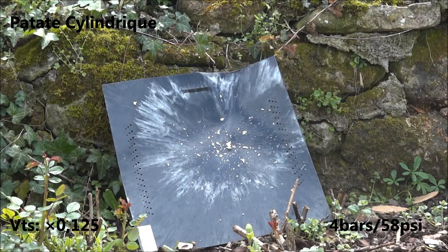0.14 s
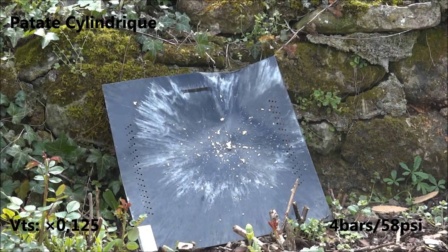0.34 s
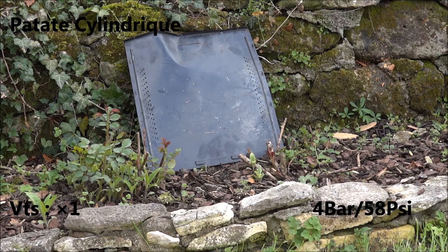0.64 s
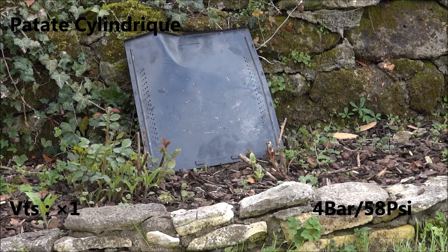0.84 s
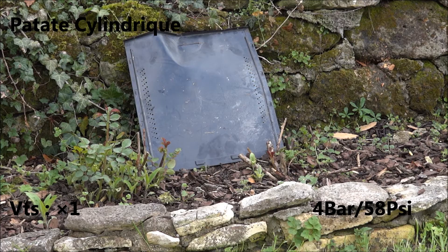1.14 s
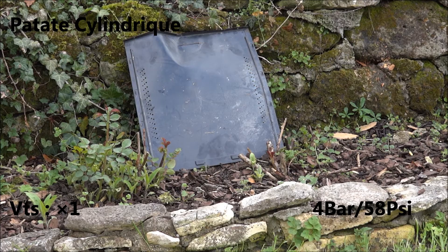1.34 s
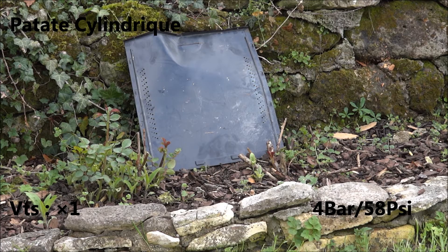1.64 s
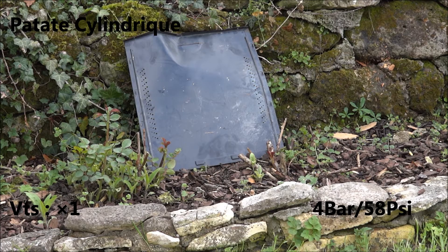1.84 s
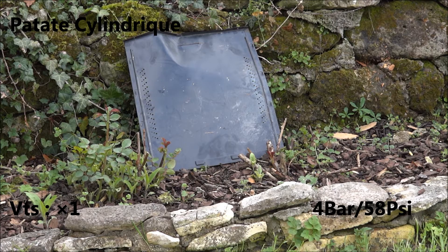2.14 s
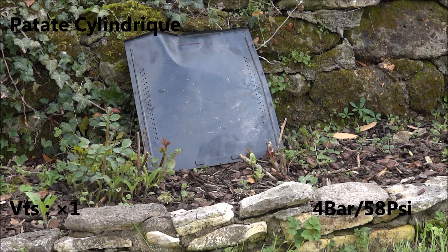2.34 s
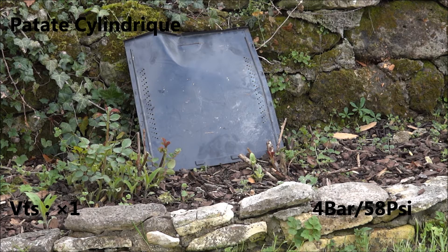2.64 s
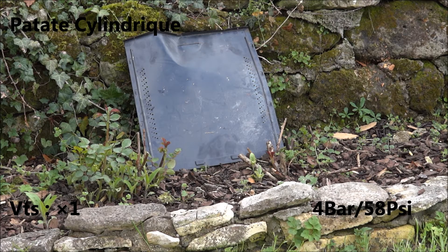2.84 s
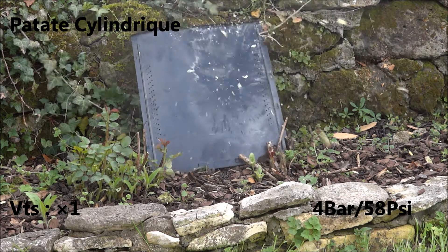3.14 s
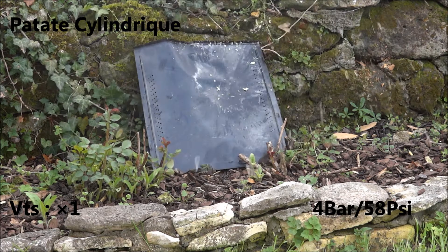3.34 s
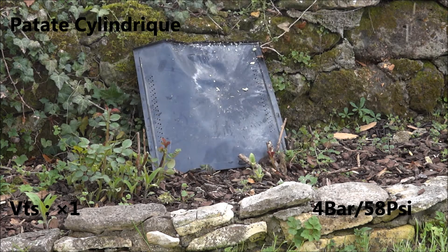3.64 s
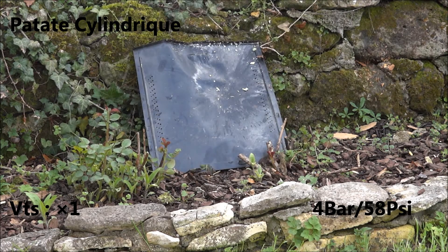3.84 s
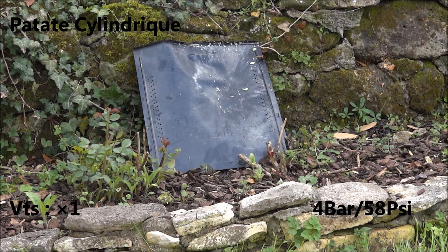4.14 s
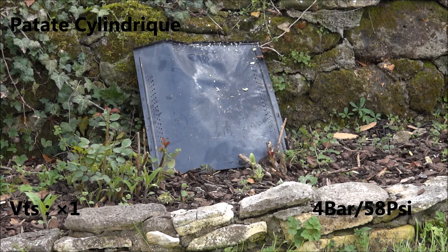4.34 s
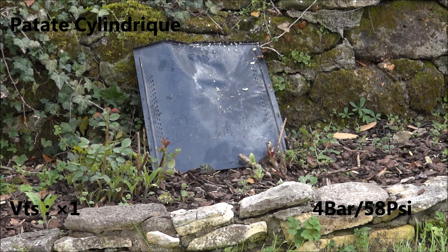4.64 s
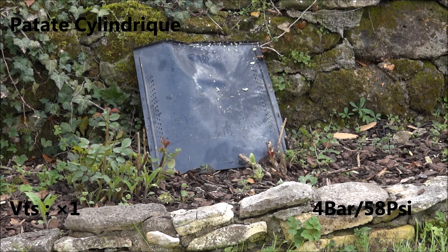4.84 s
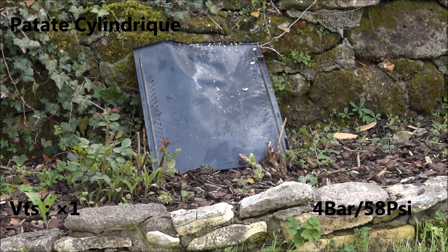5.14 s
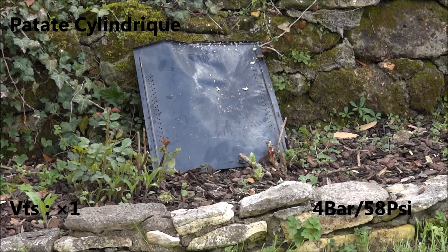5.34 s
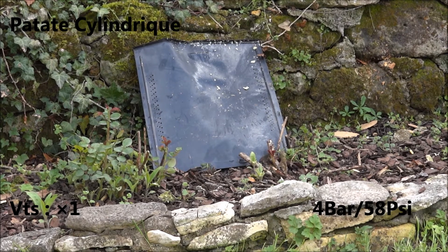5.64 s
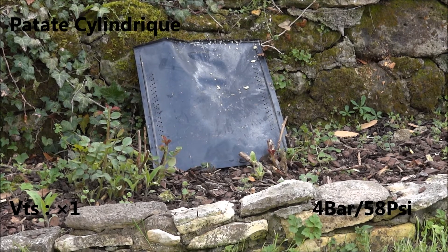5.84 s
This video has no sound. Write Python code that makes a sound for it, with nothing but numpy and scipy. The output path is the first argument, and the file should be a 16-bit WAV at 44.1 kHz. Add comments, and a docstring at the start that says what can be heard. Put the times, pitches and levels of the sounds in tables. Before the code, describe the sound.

Silence at first, then a quiet garden with small birds chirping over distant hush. Near three seconds a homemade air cannon hisses, pops twice and roars as a potato slams a thin metal plate. The sheet crashes, rattles and clanks back onto stones within half a second. The background returns ducked, slowly recovering, with light ticks, leaf rustle and sparse birds. Close, dry plate; stereo outdoor microphone.

```python
"""A hiss, two pops and a roar of air, then sheet metal crashes and rattles: an air cannon hits its plate.
The homemade cannon shoots a potato: noise for valve and jet, sine pulses that repeat along the tube.
The plate, near and dry, leans on a garden wall and rings in tuned modes; it falls back on the stones.
Gritty noise bursts make falling bits and leaves; small birds sing in swept tones over a distant hush.
At the microphone a gain control ducks and slowly recovers, peaks are rounded and the top is cut off."""
import sys
import numpy as np
from scipy import signal
from scipy.fft import rfft, irfft
from scipy.io import wavfile
from scipy.ndimage import uniform_filter1d, minimum_filter1d

SR = 44100
rng = np.random.default_rng(int(sys.argv[2]) if len(sys.argv) > 2 else 0)


def wav_out(sig):
    """Save sig, one row per channel (or a flat mono array), as 16-bit PCM at SR to the path in sys.argv[1]."""
    wavfile.write(sys.argv[1], SR, np.round(np.clip(np.atleast_2d(sig).T, -1, 1) * 32767).astype(np.int16))


N = 263975
TIME = np.arange(N) / SR

# Cannon: valve hiss spectrum (f/Hz, relative level/dB per Hz)
VALVE_COLOUR = [(100, -33.5), (500, -23), (1200, -10), (2300, -6), (3300, -7), (4400, -7), (5900, -14.5),
                (8000, -10), (10000, -13.5), (12500, -20), (14500, -17), (16000, -25.5)]
# pressure pulses in the valve, then in the barrel (t/s, level/dB, f/Hz)
POPS = [(2.8872, -4, 3450), (2.9168, -3, 2440)]
# air jet spectrum (f/Hz, relative level/dB per Hz)
JET_COLOUR = [(18, -53.5), (30, -24.5), (93, -17.5), (280, -1.5), (1130, -4), (1500, -5.5), (1670, -5.5),
              (1810, -4), (2540, -4), (3400, -7), (5900, -8.5), (8300, -8.5), (14400, -22), (16000, -41.5)]
# air hisses through the opening valve
VALVE_S, VALVE_ATTACK_S, VALVE_HOLD_S, VALVE_T60_S, VALVE_DB = 2.880, .008, .019, .05, -18
# each pulse swells, runs up and down the tube and weakens on every trip
POP_SWELL_S, POP_TRIP_S, POP_LOSS_DB = .0007, .0038, 3
# air leaks out ahead of the potato
LEAK_S, LEAK_ATTACK_S, LEAK_DB = 2.915, .007, -13.5
# the full jet follows it, sags as the tank empties, then dies away
JET_S, JET_ATTACK_S, JET_HOLD_S, JET_T60_S, JET_DB, JET_SAG_DB_PER_S = 2.972, .01, .113, .33, -4, 42

# Plate: the potato strikes, the plate slams about, then falls back on the stones
# (t/s, level/dB, bright up to f/Hz)
BLOWS = [(2.9755, 2.5, 12200), (3.010, 1.5, 550), (3.016, -4, 7000), (3.023, -2.5, 910), (3.041, -.5, 805),
         (3.083, -9, 3000), (3.092, -2, 1480), (3.135, -8, 684), (3.278, -21.5, 3000), (3.2912, -7.5, 5100),
         (3.2945, -10, 3000), (3.329, -9.5, 500), (3.381, -19.5, 2000)]
# its strongest modes (f/Hz, relative level/dB, t60/s)
PLATE_MODES = [(201.8, -8, .2), (235, -7, 0.25), (267, -5, 0.23), (332.5, -10, 0.31), (395.6, -4, .2),
               (452, -1.5, 0.18), (543, -2, 0.2), (596.7, -5.5, .2), (653, -11.5, 0.11), (765, -5.5, 0.27),
               (825, -2.5, 0.15), (837, -2.5, 0.3), (1058, -3, 0.19), (1164, -5.5, 0.26), (1270, -14, 0.27),
               (1480, -8, 0.12), (1660, -8.5, .2), (2000, -9, 0.2), (2110, -13.5, .22), (2580, -7, .18)]
# its crowd of weaker modes: spectrum (f/Hz, relative level/dB per Hz) and decay (f/Hz, t60/s)
CRASH_COLOUR = [(30, -48), (100, -28), (200, -12), (450, -9.5), (900, -7.5), (1600, -4.5), (2600, -6),
                (4000, -4), (6500, -8), (10000, -6), (12500, -24), (16000, -25.5)]
CRASH_T60 = [(200, .22), (1000, 0.36), (3000, 0.088), (10000, .09)]
# after a blow the sheet chatters in weaker, duller rebounds
REBOUND_S, REBOUND_LOSS_DB, REBOUND_DULLING = .02, 14, .7
# build-up time of a contact bright up to 1 kHz; brighter ones are shorter
CONTACT_S = .0013
# the plate's edge scrapes the wall as it falls back
SCRAPE_S, SCRAPE_ATTACK_S, SCRAPE_T60_S, SCRAPE_DB = 3.25, .04, .22, -28
# the sheet flexes while it is thrown clear of the wall
WOBBLE_S, WOBBLE_ATTACK_S, WOBBLE_HOLD_S, WOBBLE_T60_S = 3.15, .06, .13, .15
WOBBLE_HZ, WOBBLE_DB = 165, -45

# Ground: twigs cracking and the larger bits landing (t/s, level/dB, f/Hz, t60/s)
TICKS = [(1.013, -39, 4900, .027), (3.513, -29, 9500, .0055), (3.7257, -11.5, 9500, .0033),
         (3.7254, -25, 1600, .0095), (3.943, -35.5, 9580, .009), (4.155, -34, 8000, .0085),
         (4.175, -39, 8070, .025), (4.742, -37.5, 9000, .017), (5.273, -36.5, 5900, .062),
         (5.327, -37, 4900, .035), (5.762, -39, 3920, .0088), (5.7835, -30.5, 1600, .009)]
# smaller crumbs patter down at random, their level spread evenly to either side
PATTER_FROM_S, PATTER_TO_S, PATTER_DB, PATTER_SPREAD_DB = 4.12, 4.95, -45, 3
PATTER_HZ, PATTER_T60_S = 8200, .012
# leaves stir: peaks (t/s, level/dB, time/s to swell or settle by 8.7 dB)
RUSTLES = [(.8, -54, .03), (.89, -50.5, .11), (3.7, -57, .2), (4.3, -54, .13), (4.5, -57, .09),
           (4.76, -57, .1), (5.29, -47, .022), (5.61, -56, .025)]
# leaf spectrum (f/Hz, relative level/dB per Hz)
RUSTLE_COLOUR = [(200, -22.5), (1500, 4.5), (4000, -4), (7000, -5), (9500, 2), (12000, -9.5),
                 (16000, -10.5)]

# Birds among the trees: chips that sweep steeply down
# (t/s, length/s, start f/Hz, level/dB, left minus right/dB)
CHIPS = [(.698, .026, 5000, -53.5, 2), (1.422, .042, 4750, -49.5, 4), (1.485, .09, 5400, -60, 4),
         (2.33, .04, 5200, -57.5, 2), (2.535, .06, 3950, -53, 3), (2.833, .035, 3400, -56, 3),
         (4.097, .02, 4950, -53.5, -7), (4.19, .03, 5400, -56, -3), (4.676, .033, 5400, -53.5, -5),
         (4.789, .018, 6100, -56, 2), (5.001, .028, 5100, -49.5, -3), (5.511, .045, 4750, -56, -4)]
# the pitch chips head for; share of the way still left at the end
CHIP_FLOOR_HZ, CHIP_LEFT_SHARE = 2600, .33
# clear whistles, most sliding down, that settle on a steady or drifting note
# (t/s, length/s, start f/Hz, settled f/Hz, sag/Hz per s, level/dB, waver 0-1, left minus right/dB)
WHISTLES = [(1.085, .27, 7350, 5980, 2200, -49, .11, 4), (1.10, .28, 5250, 4750, 1200, -56, .12, 4),
            (1.655, .065, 4380, 4450, 0, -55, .06, -4), (1.765, .207, 6000, 4090, -400, -39, .16, 2.5),
            (1.955, .22, 4300, 3480, 1600, -50.5, .6, 1), (5.3, .13, 4480, 4450, 0, -61, .25, 1),
            (5.642, .05, 4660, 4460, 0, -41.5, .02, -2.5), (5.752, .06, 3660, 3590, 0, -53.5, .04, -1.5)]
# a whistle is soft at the top of its slide and gains strength as it settles
WHISTLE_SETTLE_S, WHISTLE_SLIDE_SHAPE, WHISTLE_SOFT_DB_PER_HZ = .05, 1.5, .013
# hoarse chatter on a nearly level pitch (t/s, length/s, f/Hz, level/dB, waver 0-1)
CHIRPS = [(.781, .038, 2500, -52.5, 1), (.805, .135, 3500, -46.5, .7), (.821, .08, 4250, -53.5, .6),
          (.868, .06, 2820, -41.5, .55), (.93, .019, 3560, -35.5, .26), (.941, .039, 3000, -49, 1),
          (.948, .095, 3630, -44.5, .65), (1.55, .041, 3760, -50.5, .9), (1.655, .059, 3780, -48.5, .8),
          (1.721, .028, 2880, -50, .5), (2.1, .15, 3600, -56, 1), (5.38, .24, 3300, -62, .8)]
CHIRP_PAN_DB = 4  # left minus right
# an even series of thin rising pips
PIPS_S, PIP_PERIOD_S, PIP_S, PIP_FROM_HZ, PIP_TO_HZ = 2.241, .1107, .024, 5300, 6400
PIP_DB, PIP_WAVER, PIP_PAN_DB = -58, .6, 3

# Distance: hush spectrum (f/Hz, relative level/dB per Hz)
HUSH_COLOUR = [(15, -37), (25, -13), (64, -4.5), (236, -1.5), (503, -1), (607, 2), (840, 1.5), (2480, -9.5),
               (3720, -13), (5140, -13.5), (6920, -16), (12900, -18), (14800, -22.5), (16000, -31)]
HUSH_DB = -51.4

# Microphone: stereo width of far and near sounds (f/Hz, side minus mid/dB)
FAR_WIDTH = [(60, -14), (110, -14), (200, -8), (380, -2), (700, -3), (1290, -1.5), (2380, -3), (4400, -8),
             (8120, -10.5), (15000, -29.5)]
NEAR_WIDTH = [(100, -26.5), (500, -12), (1300, -13), (3000, -12), (8000, -10.5), (14000, -19)]
# live span (from t/s, to t/s)
LIVE_SPAN = (.553, 5.957)
TOP_HZ = 15700  # treble cut-off


def cannon(turbulence_db=2.5, turbulence_hz=450, sizzle_hz=10500, sizzle_power=0.3,
           gust_db=-38, gust_s=2.965, gust_length=0.028, trip_jitter=.12):
    """The valve hisses, pulses ring the tube, and a turbulent jet follows with a low gust."""
    valve = noise(VALVE_COLOUR, NEAR_WIDTH, size=N) * undb(VALVE_DB)
    valve = valve * envelope(VALVE_S, VALVE_ATTACK_S, VALVE_HOLD_S, VALVE_T60_S)

    leak = undb(LEAK_DB) * envelope(LEAK_S, LEAK_ATTACK_S, JET_S - LEAK_S, JET_T60_S)
    sag_db = JET_SAG_DB_PER_S * np.clip(TIME - JET_S, 0, JET_HOLD_S)
    jet = undb(JET_DB - sag_db) * envelope(JET_S, JET_ATTACK_S, JET_HOLD_S, JET_T60_S)
    flow = np.maximum(leak, jet)
    roar = filtered(noise(JET_COLOUR, NEAR_WIDTH, size=N), [130, sizzle_hz], "band", order=4)
    # the topmost sizzle dies first as the pressure falls
    sizzle = filtered(noise(JET_COLOUR, NEAR_WIDTH, size=N), sizzle_hz, "high", order=4)
    sizzle = sizzle * (flow / flow.max()) ** sizzle_power
    turbulence = undb(turbulence_db * walk(turbulence_hz, size=N))
    out = (valve + flow * (roar + sizzle)) * turbulence

    t = TIME[:SR // 20]
    packet = (t / POP_SWELL_S * np.exp(1 - t / POP_SWELL_S)) ** 2
    for s, db, hz in POPS:
        pulse = packet * np.sin(2 * np.pi * hz * t)
        for trip, chance in enumerate(rng.standard_normal(size=4)):
            delay = trip * POP_TRIP_S * (1 + trip_jitter * chance)
            add(out, s + delay, undb(db - trip * POP_LOSS_DB) * pulse)

    gust = noise([(15, -7), (40, 0), (90, -3), (200, -26), (600, -79)], NEAR_WIDTH, size=N)
    return out + undb(gust_db) * gust * np.exp(-((TIME - gust_s) / gust_length) ** 2)


def plate(modes_db=-6.0, crash_db=-2, bend_share=.014):
    """Each blow rings the modes in new phases over a short crash; soft contacts are dull."""
    out, t = np.zeros((2, N)), TIME[:SR // 2]
    hz, db, t60 = np.transpose(PLATE_MODES)[:, :, None]
    rings = undb(db) / np.sqrt(np.sum(undb(db) ** 2) / 2) * fade(t, t60)
    octave = np.log2(np.clip(np.fft.rfftfreq(len(t), 1 / SR), 2 ** 7, 2 ** 14))
    for s, blow_db, bright_hz in contacts():
        # the buckling sheet is tuned a little differently at every blow
        bent_hz = hz * (1 + bend_share * rng.standard_normal(hz.shape))
        phase = 2 * np.pi * (bent_hz * t + rng.random(hz.shape))
        ring = np.sum(rings * np.sin(phase), axis=0)

        # the crowd decays octave by octave, each at its own rate
        crowd = rfft(noise(CRASH_COLOUR, NEAR_WIDTH, size=len(t)))
        crash = 0
        for k in range(7, 15):
            band = irfft(crowd * np.maximum(1 - abs(octave - k), 0), len(t))
            crash = crash + band * fade(t, over_pitch(CRASH_T60, 2 ** k))

        contact = CONTACT_S * np.sqrt(1000 / bright_hz)
        blow = (undb(modes_db) * ring + undb(crash_db) * crash) * (1 - np.exp(-t / contact))
        add(out, s, undb(blow_db) * filtered(blow, bright_hz, "low"))
    return out


def contacts(count=2, uneven=.3):
    """Every blow and its unevenly spaced rebounds, as (t/s, level/dB, bright up to f/Hz)."""
    gaps = REBOUND_S * np.exp(uneven * rng.standard_normal((len(BLOWS), count)))
    hits = []
    for (s, db, hz), row in zip(BLOWS, gaps):
        for k, late in enumerate([0, *np.cumsum(row)]):
            hits.append((s + late, db - k * REBOUND_LOSS_DB, hz * REBOUND_DULLING ** k))
    return hits


def scrape():
    """The sliding edge rubs the plate's crowd of modes."""
    rub = noise(CRASH_COLOUR, NEAR_WIDTH, size=N) * undb(SCRAPE_DB)
    return rub * envelope(SCRAPE_S, SCRAPE_ATTACK_S, 0, SCRAPE_T60_S)


def wobble(skirt_db=-25):
    """The loose sheet flexes with a low flutter, a narrow hump of noise."""
    colour = [(WOBBLE_HZ / 10, -60), (WOBBLE_HZ / 2, skirt_db), (WOBBLE_HZ, 0),
              (WOBBLE_HZ * 2, skirt_db), (WOBBLE_HZ * 10, -80)]
    flutter = noise(colour, NEAR_WIDTH, size=N) * undb(WOBBLE_DB)
    return flutter * envelope(WOBBLE_S, WOBBLE_ATTACK_S, WOBBLE_HOLD_S, WOBBLE_T60_S)


def ticks(grain_db=3, body_db=-9):
    """Twigs and landing bits: short gritty bursts, each with one broad resonance."""
    out, t = np.zeros((2, N)), TIME[:SR // 5]
    for s, db, hz, t60 in [*TICKS, *patter()]:
        colour = [(hz / 40, -25), (hz / 3, body_db), (hz, 0), (hz * 2, -16), (hz * 8, -45)]
        grain = undb(grain_db * walk(1350, size=len(t)))
        burst = noise(colour, NEAR_WIDTH, size=len(t)) * fade(t, t60) * grain
        add(out, s, undb(db) * burst / 2)
    return out


def patter(count=10):
    """Crumbs land at random, as (t/s, level/dB, f/Hz, t60/s)."""
    crumbs = []
    for when, size in rng.random((count, 2)):
        s = PATTER_FROM_S + when * (PATTER_TO_S - PATTER_FROM_S)
        db = PATTER_DB + PATTER_SPREAD_DB * (2 * size - 1)
        crumbs.append((s, db, PATTER_HZ, PATTER_T60_S))
    return crumbs


def rustle(grain_db=5, grain_hz=700):
    """Dry leaves rub in a dense crackle of tiny grains."""
    crackle = noise(RUSTLE_COLOUR, NEAR_WIDTH, size=N) * undb(grain_db * walk(grain_hz, size=N))
    stir = sum(undb(db) * np.exp(-abs(TIME - s) / swell) for s, db, swell in RUSTLES)
    return unit(crackle) * stir


def birds(chip_waver=.2, chirp_rise=.01):
    """Four kinds of call: falling chips, settling whistles, hoarse chatter and a series of pips."""
    out = np.zeros((2, N))
    for s, length, hz, db, pan_db in CHIPS:
        left = CHIP_LEFT_SHARE ** np.linspace(0, 1, int(length * SR))
        path_hz = CHIP_FLOOR_HZ + (hz - CHIP_FLOOR_HZ) * left
        add(out, s, syllable(path_hz, db, chip_waver, pan_db))
    for s, length, start_hz, settled_hz, sag, db, waver, pan_db in WHISTLES:
        t = TIME[:int(length * SR)]
        above_hz = (start_hz - settled_hz) * np.exp(-(t / WHISTLE_SETTLE_S) ** WHISTLE_SLIDE_SHAPE)
        path_hz = settled_hz + above_hz - sag * t
        add(out, s, syllable(path_hz, db - WHISTLE_SOFT_DB_PER_HZ * above_hz, waver, pan_db))
    for s, length, hz, db, waver in CHIRPS:
        path_hz = hz * (1 + chirp_rise * np.linspace(-1, 1, int(length * SR)))
        add(out, s, syllable(path_hz, db, waver, CHIRP_PAN_DB))
    pip_hz = np.linspace(PIP_FROM_HZ, PIP_TO_HZ, int(PIP_S * SR))
    for k in range(6):
        add(out, PIPS_S + k * PIP_PERIOD_S, syllable(pip_hz, PIP_DB, PIP_WAVER, PIP_PAN_DB))
    return out


def syllable(hz, db, waver, pan_db, waver_share=.082, waver_hz=330, flutter_db=2, overtone_db=-14):
    """A near-pure note along a pitch path; a hoarse one wavers and gains an overtone."""
    u = np.linspace(0, 1, len(hz))
    wavering_hz = hz * (1 + waver_share * waver * walk(waver_hz, size=SR)[:len(u)])
    phase = 2 * np.pi * np.cumsum(wavering_hz) / SR
    swell = np.sqrt(8 * u * (1 - u)) * undb(db + flutter_db * walk(90, size=SR)[:len(u)])
    tone = np.sin(phase) + waver ** 2 * undb(overtone_db) * np.sin(2 * phase)
    return swell * tone * undb([[pan_db / 2], [-pan_db / 2]])


def hush(sway_db=1.4, chorus_db=-61, chorus_sway_db=3):
    """Distant air and traffic as swaying noise, with a blur of far birds."""
    air = noise(HUSH_COLOUR, FAR_WIDTH, size=N) * undb(HUSH_DB + sway_db * walk(5, size=N))
    chorus_colour = [(1800, -50), (3000, -2.5), (3700, -1.5), (4600, -4), (7500, -37)]
    chorus = noise(chorus_colour, FAR_WIDTH, size=N)
    return air + chorus * undb(chorus_db + chorus_sway_db * walk(11, size=N))


def garden(x, wet_db, t60, delay, width):
    """Direct sound plus diffuse echoes off walls and trees, which build up and then decay."""
    t = TIME[:SR]
    tail = noise([(100, 1), (4000, -2.5), (16000, -4.5)], width, size=SR)
    tail = tail * fade(t, t60) * (1 - np.exp(-(t / delay) ** 2))
    echoes = signal.fftconvolve(x, unit(tail) / np.sqrt(SR), axes=1)[:, :N]
    return x + undb(wet_db) * echoes


def undb(db):
    """Decibels to gain."""
    return 10 ** (np.asarray(db) / 20)


def over_pitch(points, hz):
    """Read (f/Hz, value) points on a log-frequency axis."""
    f, value = np.transpose(points)
    return np.interp(np.log(np.maximum(hz, 1)), np.log(f), value)


def fade(t, t60):
    """Exponential decay by 60 dB in t60 seconds."""
    return np.exp(-np.log(1000) * t / t60)


def envelope(s, attack, hold, t60):
    """Swell, hold, then die away."""
    t = TIME - s
    return np.clip(t / attack, 0, 1) ** 2 * fade(np.maximum(t - attack - hold, 0), t60)


def unit(x):
    """Scale to rms 1."""
    return x / np.sqrt(np.mean(x ** 2))


def walk(rate, size):
    """Random wander: straight lines between normal draws, `rate` of them a second."""
    steps = rng.standard_normal(int(size / SR * rate) + 2)
    return np.interp(np.arange(size) / SR * rate, np.arange(len(steps)), steps)


def noise(colour, width, size):
    """Stereo noise of rms 1 with a given spectrum and width."""
    hz = np.fft.rfftfreq(size, 1 / SR)
    mid, side = rfft(rng.standard_normal((2, size)))
    side = side * undb(over_pitch(width, hz))
    left_right = np.array([mid + side, mid - side])
    return unit(irfft(left_right * undb(over_pitch(colour, hz)), size))


def filtered(x, hz, kind, order=2):
    """Butterworth filter."""
    sos = signal.butter(order, np.clip(hz, 5, .48 * SR), kind, fs=SR, output="sos")
    return signal.sosfilt(sos, x)


def add(out, s, sound):
    """Mix a sound in at a time in seconds."""
    start = int(s * SR)
    out[:, start:start + sound.shape[-1]] += sound[..., :N - start]


def scene():
    """The plate is near and dry, the cannon wakes more echoes; the birds sit further off among trees."""
    shot = garden(cannon(), wet_db=-17.5, t60=.55, delay=.045, width=NEAR_WIDTH)
    # a free-standing sheet radiates little bass
    sheet = filtered(plate() + scrape() + wobble(), 160, "high", order=4)
    target = garden(sheet + ticks(), wet_db=-23, t60=.35, delay=.02, width=NEAR_WIDTH)
    song = garden(birds(), wet_db=-5, t60=0.58, delay=0.01, width=FAR_WIDTH)
    return shot + target + song + rustle() + hush()


def gain_control(x, top_db=-9, range_db=9, hold=.9, recovery_db=5):
    """Turns down just ahead of a loud sound, within its range, holds, then recovers in dB a second."""
    power = uniform_filter1d(np.mean(x ** 2, axis=0), size=SR // 200)
    excess_db = np.clip(10 * np.log10(np.maximum(power, 1e-12)) - top_db, 0, range_db)
    # the largest excess over the past hold time
    half = int(hold * SR / 2)
    held_db = -minimum_filter1d(-excess_db, 2 * half + 1, origin=half)
    # the cut may shrink no faster than the recovery rate
    recovered_db = recovery_db * TIME
    cut_db = np.maximum.accumulate(held_db + recovered_db) - recovered_db
    return x * undb(-uniform_filter1d(cut_db, size=SR // 500))


def record(dry):
    """Gain control, rounded peaks and the treble cut-off; silent outside the live span."""
    live = (TIME > LIVE_SPAN[0]) & (TIME < LIVE_SPAN[1])
    x = gain_control(dry) * live
    rounded = x / (1 + (x / .9) ** 6) ** (1 / 6)
    return signal.sosfilt(signal.ellip(8, .2, 70, TOP_HZ, fs=SR, output="sos"), rounded)


dry = scene()
out = record(dry)
wav_out(out)
```